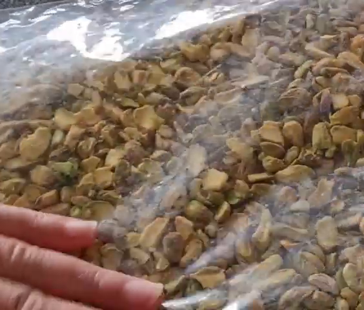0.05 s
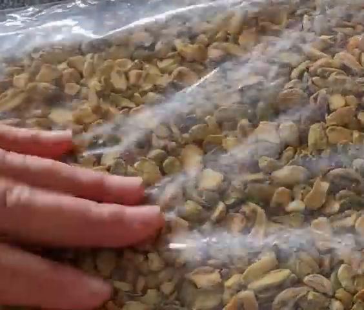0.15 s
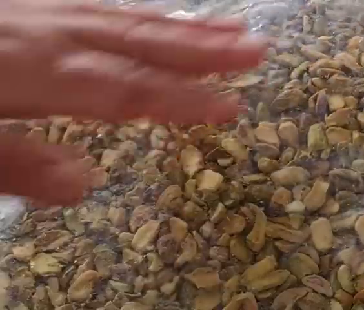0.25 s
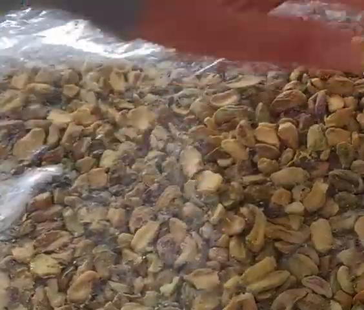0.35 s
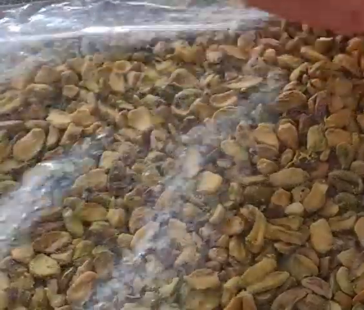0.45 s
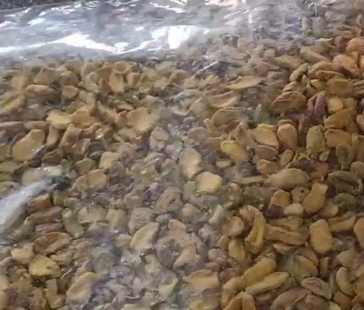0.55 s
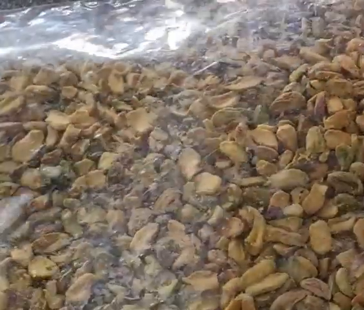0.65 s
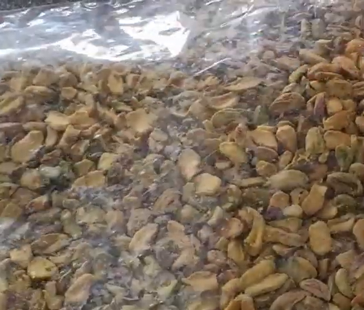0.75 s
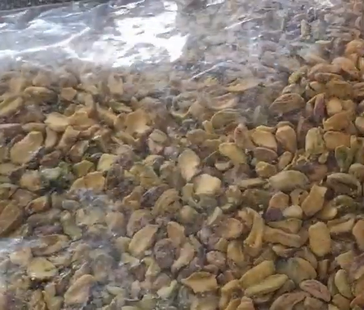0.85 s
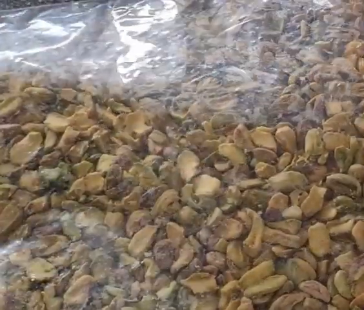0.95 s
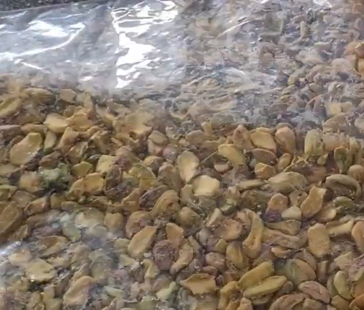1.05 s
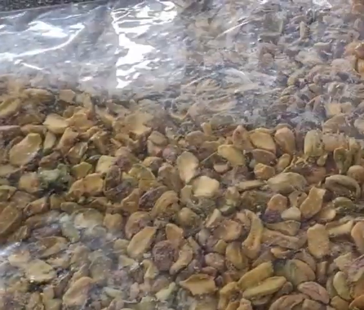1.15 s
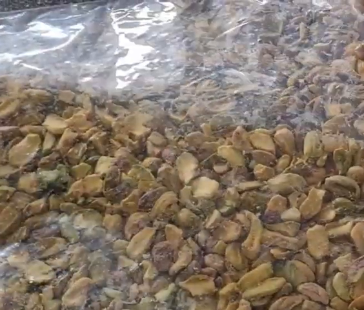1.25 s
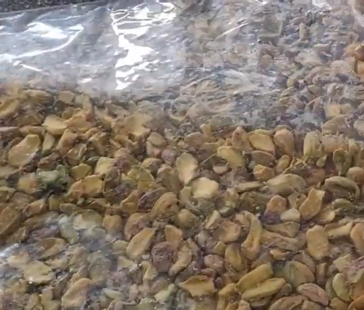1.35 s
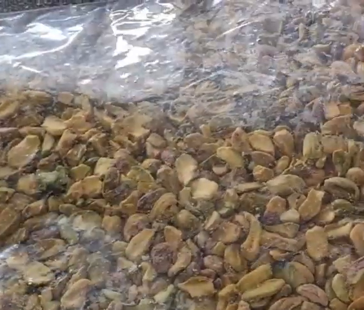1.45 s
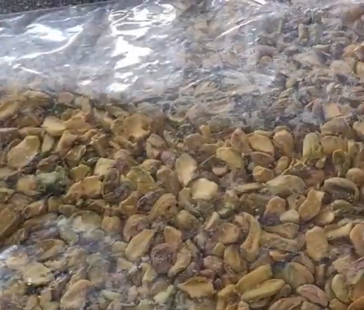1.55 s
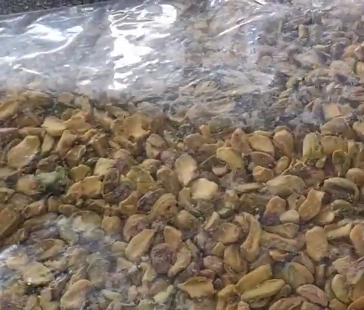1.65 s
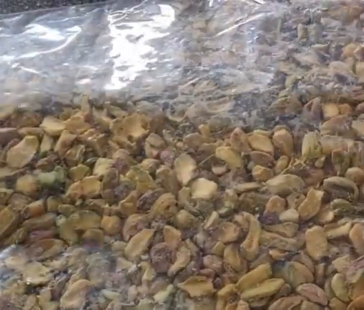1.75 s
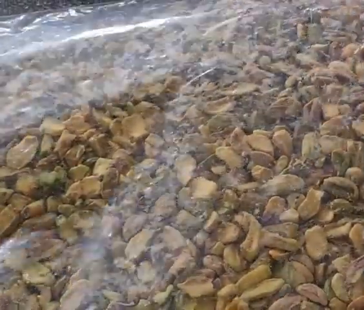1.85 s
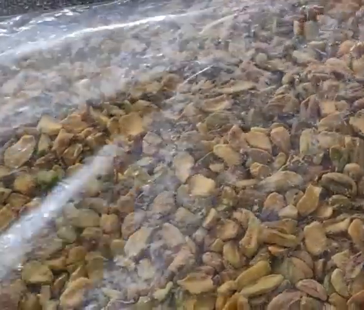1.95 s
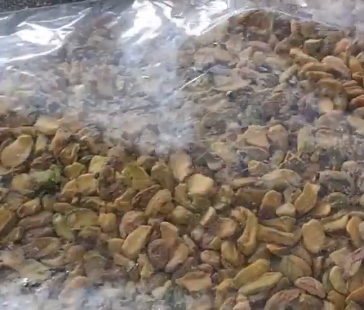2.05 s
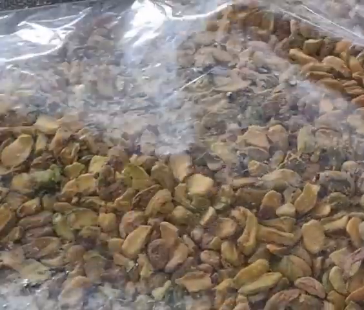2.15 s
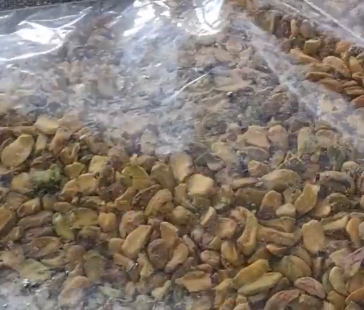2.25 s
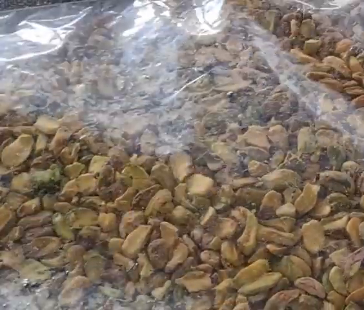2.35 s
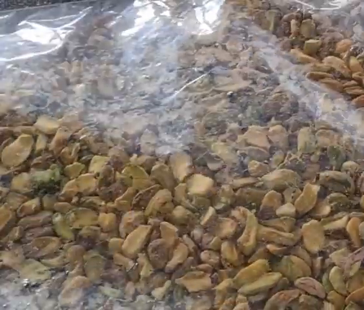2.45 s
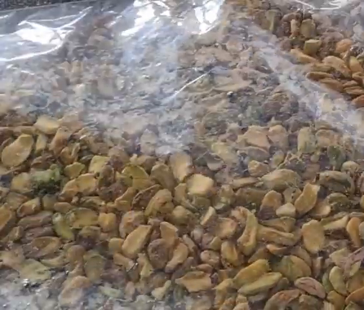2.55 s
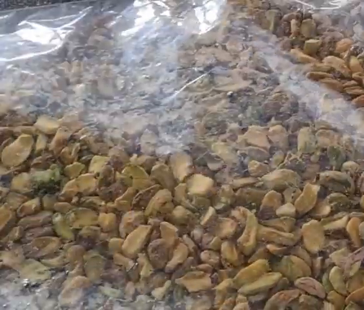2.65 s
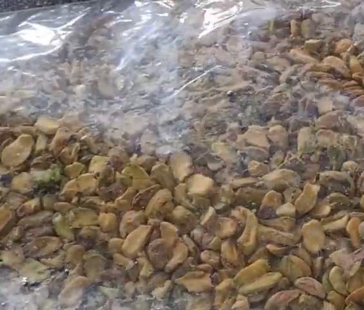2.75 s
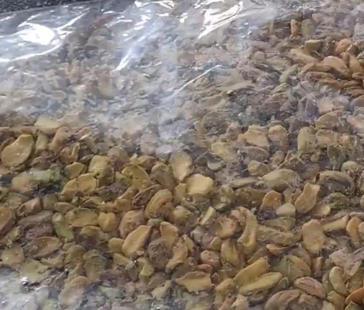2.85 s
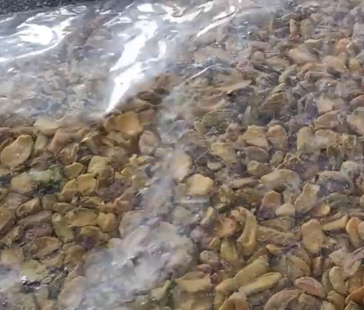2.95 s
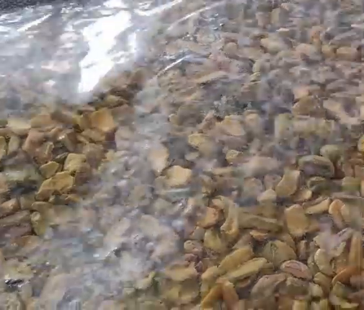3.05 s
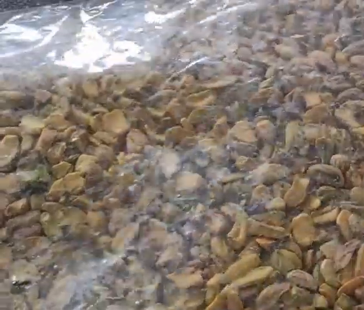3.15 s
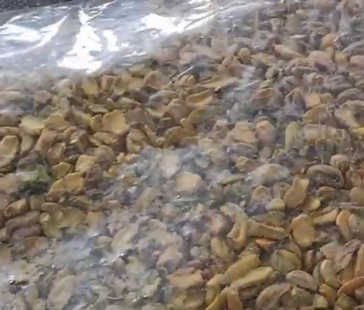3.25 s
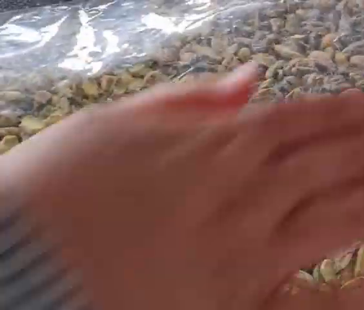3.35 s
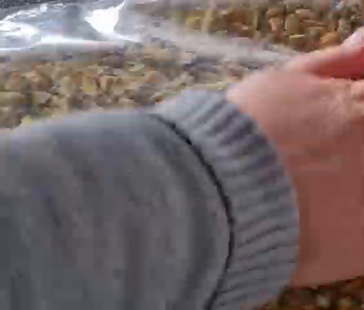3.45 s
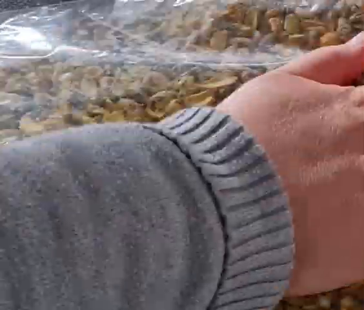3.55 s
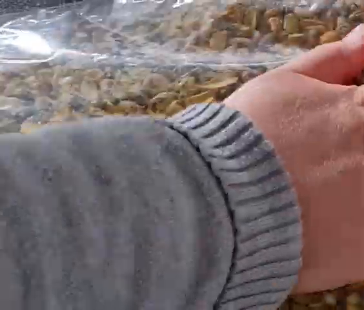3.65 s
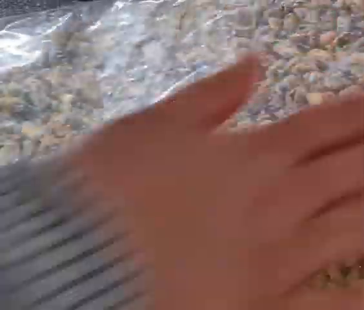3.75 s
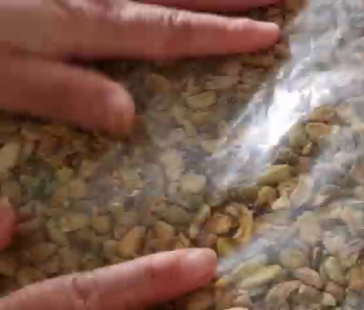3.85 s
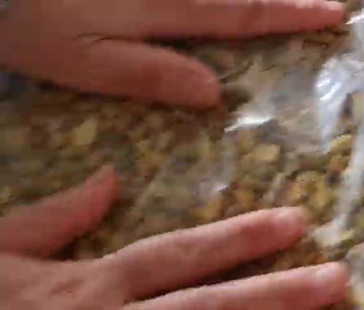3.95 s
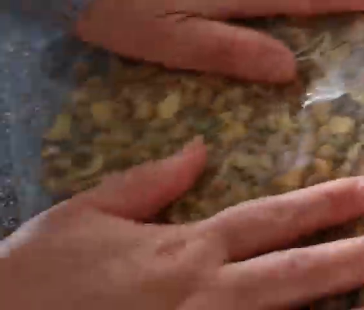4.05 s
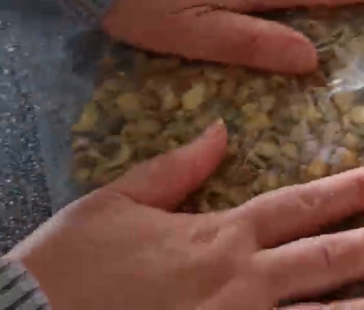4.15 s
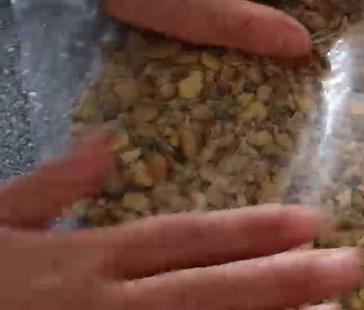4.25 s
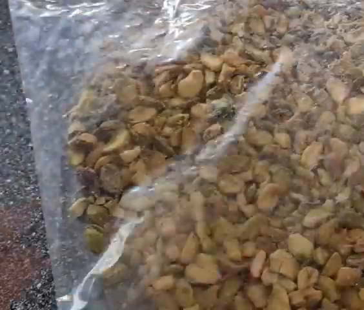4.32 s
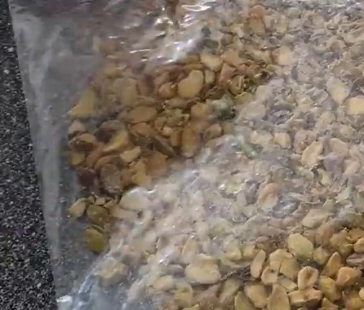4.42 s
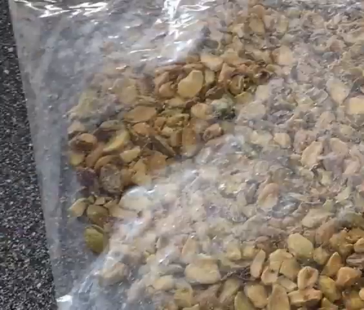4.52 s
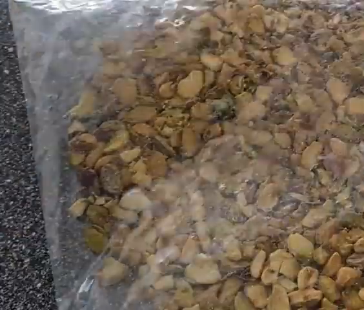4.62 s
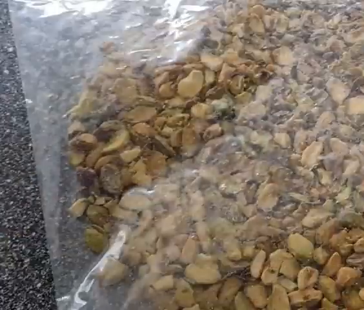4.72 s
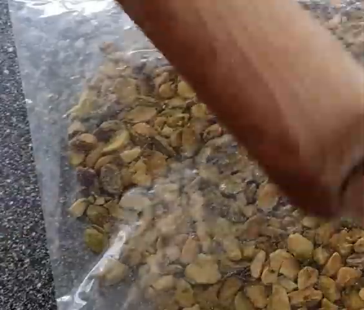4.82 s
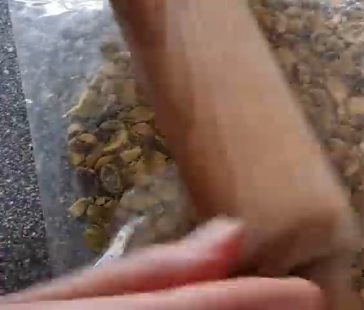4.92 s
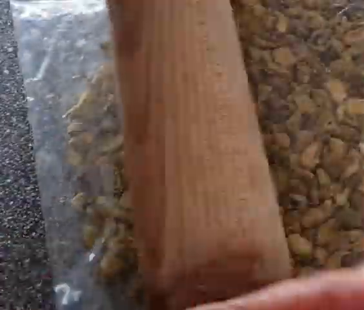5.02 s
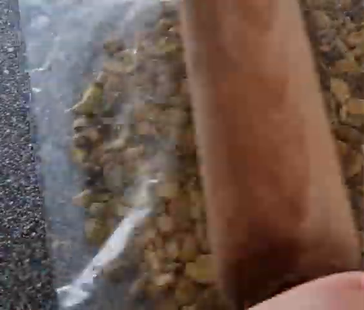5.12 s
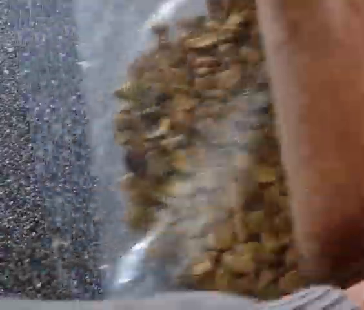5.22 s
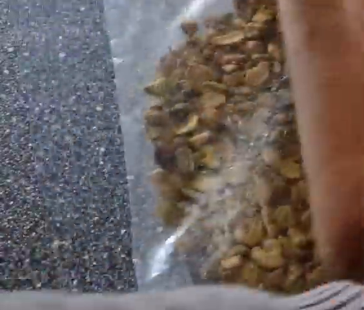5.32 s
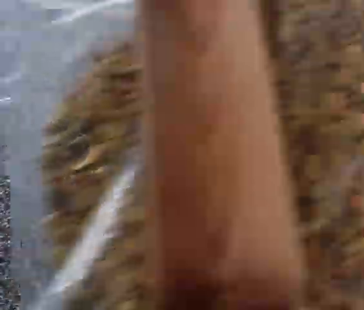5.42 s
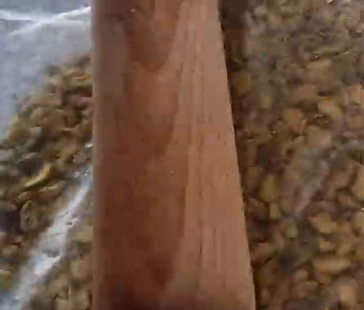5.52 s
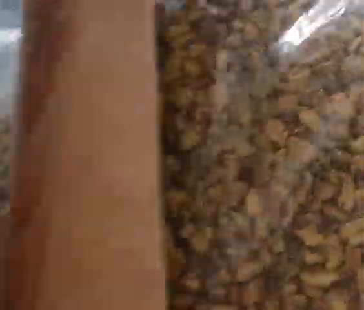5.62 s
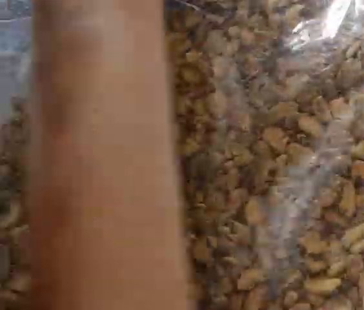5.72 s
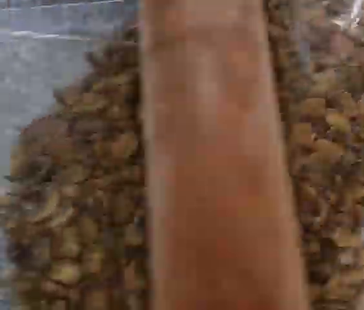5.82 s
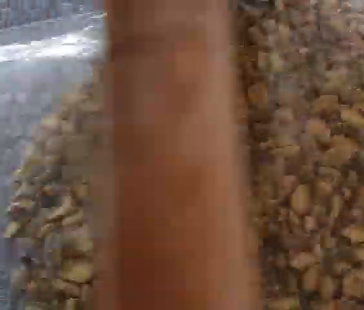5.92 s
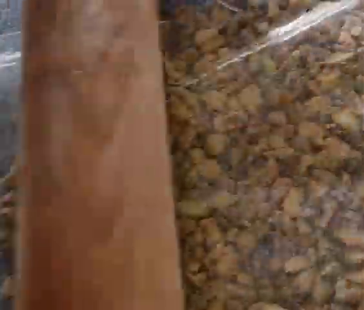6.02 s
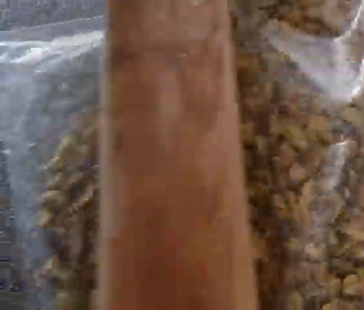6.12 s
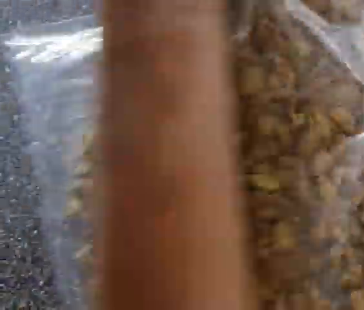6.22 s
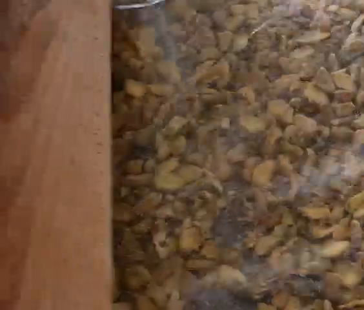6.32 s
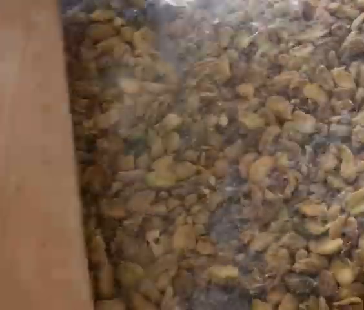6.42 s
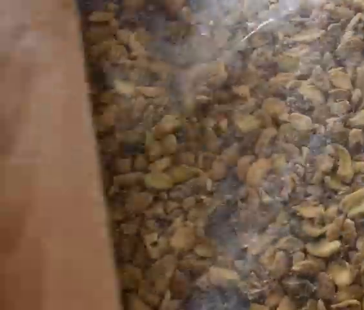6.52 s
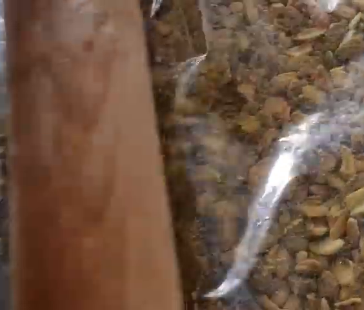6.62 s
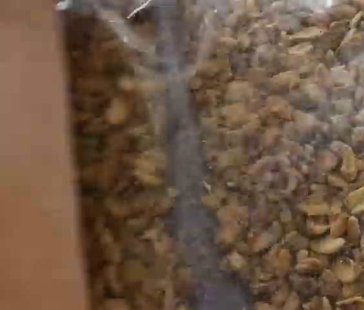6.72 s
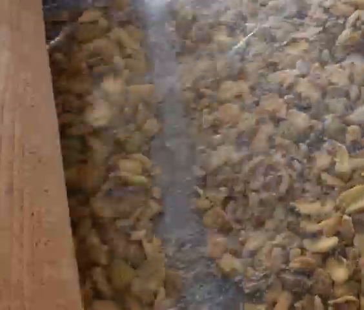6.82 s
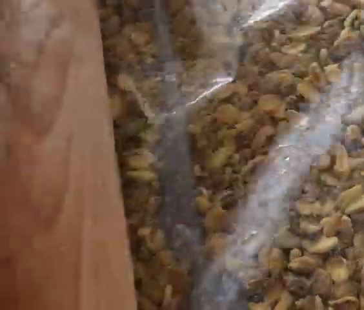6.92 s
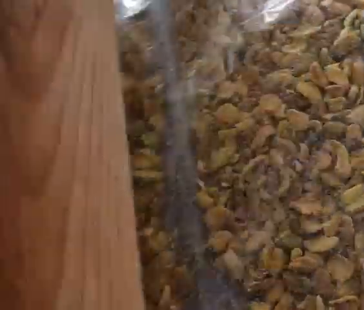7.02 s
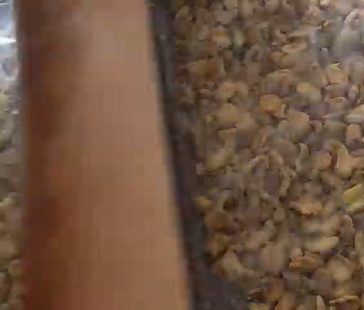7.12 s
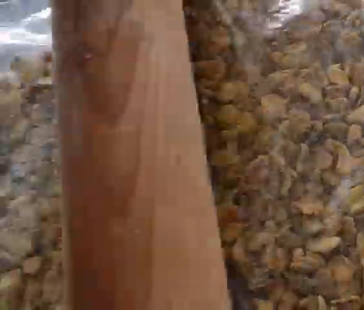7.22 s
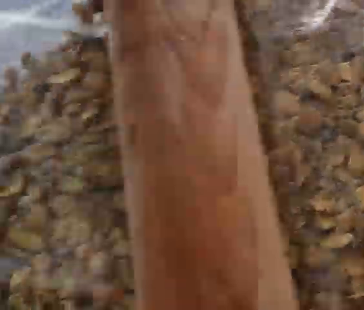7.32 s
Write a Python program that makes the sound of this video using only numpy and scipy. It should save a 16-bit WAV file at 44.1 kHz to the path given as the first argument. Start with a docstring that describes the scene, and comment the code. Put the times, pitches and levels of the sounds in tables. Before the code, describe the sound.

Light crinkling of a nut-filled plastic bag under moving hands gives way to a heavy counter thud, low rumble and dull crackling crunches.

```python
"""Plastic film rustles and snaps in short bursts as hands smooth a bag of nuts on a kitchen counter;
then a wooden rolling pin is set down with a knock and pushed over it, and the nuts crunch.
Film and nuts are bursts of coloured noise in three ranges: body, snap and fizz. The counter thuds and
the pin knocks as sums of decaying modes. Moving hands and pin add low rumble, the brushing pin a breathy
rub; a faint fuzzy squeak is a pair of tones. A little room and quiet air surround it all."""
import sys
import numpy as np
from scipy import signal
from scipy.fft import rfft, irfft, next_fast_len
from scipy.io import wavfile
from scipy.ndimage import uniform_filter1d, map_coordinates

SR = 44100
rng = np.random.default_rng(int(sys.argv[2]) if len(sys.argv) > 2 else 0)


def log_audio(samples):
    """Write samples as a 16-bit WAV file to the path given in sys.argv[1]."""
    # one column per channel
    frames = np.atleast_2d(samples).T
    # limit to full scale, then quantise
    limited = np.clip(frames, -1, 1)
    pcm = np.round(limited * 32767).astype(np.int16)
    wavfile.write(sys.argv[1], SR, pcm)


def field_ratio(decibels):
    """Amplitude ratio for a level in dB (20 dB per decade); scalars and array-likes work."""
    return 10 ** (np.asarray(decibels, dtype=float) / 20)


N = 325017

# colour of the quiet air: f/Hz, relative density/dB
AIR_COLOUR = [(25, 13), (110, -14), (220, -3), (400, -3.5), (1200, -16), (3500, -19), (6500, -12),
              (16000, -27)]
# decay of the kitchen: f/Hz, t60/s
KITCHEN_DECAY = [(200, 0.2), (10000, 0.12)]
# a faint falling squeak: t/s, f/Hz, level/dB
SQUEAK_PATH = [(2.73, 3770, -99), (2.75, 3780, -69), (2.82, 3550, -81), (2.85, 3400, -99)]
# breathy bands of the pin brushing the film: f/Hz, relative density/dB
BRUSH_COLOUR = [(1500, -11.5), (2100, 2), (2750, -18), (3500, -5), (4400, -25)]
# hands and pin moving over the counter: t/s, rumble level/dB
DRAG_PATH = [(0, -69.5), (.95, -68.5), (1.2, -79.5), (3.1, -75), (4.4, -71.5), (5.05, -65.5), (5.14, -48),
             (5.7, -53), (5.9, -52), (7.37, -57)]
# colour of that rumble: f/Hz, relative density/dB
RUMBLE_COLOUR = [(20, -2.5), (60, 0), (120, 3.5), (280, -16), (400, -60)]
# palms and pin pressing the counter: t/s, level/dB, extra level of the deep modes/dB (6 more is added)
THUD_HITS = [(0.009, -53, -7), (0.521, -38.5, -17), (2.071, -60, -19), (3.271, -56.5, 0.5),
             (3.561, -53, 4.5), (3.619, -47, -1.5), (3.859, -51.5, -3), (4.037, -48, 2.5),
             (4.416, -37.5, -8), (4.836, -40.5, -37), (5.11, -16, -13.5), (5.261, -27, -4),
             (5.369, -21.5, -22), (5.802, -47, 2.5), (5.935, -33, -3.5), (6.125, -26.5, -0.5),
             (6.401, -38, -2.5), (6.608, -21, 0), (6.902, -25, 0), (7.03, -33.5, -3.5), (7.17, -48.5, 3.5),
             (7.299, -30.5, 1)]
# modes of the counter: f/Hz, relative level/dB, t60/s
COUNTER_MODES = [(61.2, -3.5, 0.52), (89.2, -5, 0.49), (121, 0, 0.28), (162.5, -8, 0.13),
                 (230.2, -7.5, 0.28), (311.6, -9, 0.13), (394.3, -14.5, 0.18)]
# the pin bumping the counter: t/s, level/dB, hardness as extra level of the upper modes/dB
PIN_KNOCKS = [(4.726, -38.5, -14.5), (5.195, -38, -18), (5.268, -27.5, -34), (5.284, -26.5, -39)]
# modes of the wooden pin: f/Hz, relative level/dB, t60/s
PIN_MODES = [(618, -1.5, 0.073), (714, 2.5, 0.13), (795, -2, 0.035), (1353, -16.5, 0.74), (2302, 7, 0.22),
             (3290, -6, 0.19), (4700, -20, 0.32)]
# film and nuts sliding under hand or pin: start t/s, length/s, start level/dB, end level/dB
BAG_SLIDES = [(0, 0.071, -46.5, -67), (0.08, 0.39, -69.5, -68), (0.615, .18, -58, -66),
              (0.955, 0.17, -70, -60), (1.184, 0.25, -70.5, -68.5), (1.575, 0.53, -62, -68.5),
              (2.167, 0.12, -58.5, -65.5), (2.414, 0.09, -60.5, -72), (2.834, 0.061, -76.5, -60.5),
              (3.077, 0.14, -76.5, -63.5), (3.288, 0.324, -73.5, -64.5), (3.72, 0.18, -52, -78.5),
              (4.076, 0.35, -47, -65.5), (4.582, 0.12, -73.5, -59), (4.994, 0.081, -68.5, -62.5),
              (5.155, 0.32, -49, -48), (5.513, 0.3, -45.5, -56.5), (5.896, 0.46, -52, -49),
              (6.622, 0.28, -62, -57), (7.066, 0.15, -62, -62)]
# snaps of film and crunches of nuts: peak t/s, snap level/dB, fizz level relative to snap/dB, length/s
BAG_CRACKS = [(.095, -46.5, -6.5, 0.015), (0.199, -38.5, -8, 0.007), (0.304, -39.5, -12.5, .0062),
              (.611, -37.5, -6, 0.0045), (0.858, -54, -0.5, 0.019), (1.047, -51, -3.5, 0.018),
              (1.092, -39, -4.5, 0.0072), (1.427, -43, -5.5, 0.0032), (1.586, -44, -4.5, 0.006),
              (1.668, -43.5, 0, 0.0038), (1.722, -49.5, -3, 0.011), (1.872, -49.5, -14, 0.01),
              (2.029, -49, -0.5, 0.022), (2.202, -46, 0.5, 0.013), (2.259, -48.5, -25, 0.007),
              (2.451, -56, -29, 0.0088), (2.527, -53.5, -4, 0.01), (2.597, -52.5, -1, 0.0032),
              (2.939, -40, -15, 0.0031), (3.141, -53, -10, 0.015), (3.216, -54.5, 1.5, 0.012),
              (3.347, -44, -16, 0.0017), (3.627, -37.5, -9, 0.011), (3.86, -39.5, -12, 0.0086),
              (4.032, -34.5, -8, 0.012), (4.364, -50.5, -13, .014), (4.427, -50.5, -7, 0.015),
              (4.538, -50.5, -1, 0.015), (4.734, -53, -45, 0.01), (5.117, -32.5, -32, 0.0063),
              (5.277, -41.5, -8, 0.03), (5.376, -33.5, -7.5, 0.011), (5.496, -29, -13, 0.0096),
              (5.767, -50.5, -26, 0.016), (5.85, -46, -19, 0.0044), (5.936, -37.5, -7.5, 0.02),
              (5.988, -35.5, -30, 0.0051), (6.036, -48, -2, 0.0052), (6.134, -31, -30, 0.0054),
              (6.247, -26, -18, 0.0068), (6.425, -32, -6.5, 0.021), (6.513, -40.5, -15, 0.0084),
              (6.609, -34, -27, 0.0071), (6.663, -31, -45, 0.011), (6.691, -24, -1, 0.011),
              (6.761, -33, -13, 0.0095), (6.906, -31, -26, .0097), (7.029, -32.5, -40, .014),
              (7.05, -29.5, -6.5, 0.0086), (7.172, -50.5, -19, 0.0095), (7.305, -38.5, -10.5, 0.016)]
# thin ticks of creasing film: t/s, level/dB
FILM_TICKS = [(0.9602, -38.5), (1.134, -43), (1.446, -40.5), (1.7554, -31), (1.9762, -34.5), (2.0906, -33),
              (2.4546, -46.5), (2.9265, -25), (3.5674, -41), (5.46, -26.5), (5.912, -32.5), (6.3045, -29),
              (6.339, -30), (7.1372, -27)]
# share of body, snap and fizz in a tick: relative level/dB
TICK_SHARES = [-28, -24.5, -7]
# colour of the crunch's body: f/Hz, relative density/dB
BODY_COLOUR = [(150, -53), (260, -3.5), (450, -6), (1300, -10), (1900, -75)]
# colour of snapping film: f/Hz, relative density/dB
SNAP_COLOUR = [(800, -53.5), (1500, -4), (2800, -2), (5600, -7), (6300, -39)]
# duller colour of nuts breaking under the pin: f/Hz, relative density/dB
CRUSH_COLOUR = [(700, -24), (1300, 3.5), (3000, -3.5), (6000, -24.5)]
# colour of the fizzing treble: f/Hz, relative density/dB
FIZZ_COLOUR = [(5000, -13), (5900, -2.5), (11000, -7), (15500, -11.5), (16200, -40)]


def unit(x):
    """Scales a sound to rms 1."""
    return x / np.sqrt(np.mean(x ** 2) + 1e-20)


def along(points, hz):
    """Reads a curve of (f/Hz, value) points on a log frequency axis."""
    f, value = np.transpose(points)
    return np.interp(np.log(hz + 1), np.log(f + 1), value)


def curves(rows):
    """Draws one value per sample for each column after the time."""
    s, *columns = np.transpose(rows)
    return [np.interp(np.arange(N) / SR, s, column) for column in columns]


def wobble(rate):
    """A smooth random curve with rate knots a second."""
    knots = np.arange(N) * rate / SR
    return map_coordinates(rng.standard_normal(N // 20), [knots])


def noise(colour, alike, grain_db, rate, patchy_db):
    """Stereo coloured noise, rms 1: its size varies from grain to grain, brief resonances come and go."""
    _, _, z = signal.stft(rng.standard_normal((2, N)), SR, nperseg=512)
    patches = uniform_filter1d(rng.standard_normal(z.shape[1:]), size=4, axis=0)
    patches = unit(uniform_filter1d(patches, size=5, axis=1))
    patchy = signal.istft(z * field_ratio(patchy_db * patches), nperseg=512)[1][:, :N]
    a, b = patchy * field_ratio(grain_db * wobble(rate))
    # alike is the left-right likeness: 0 unrelated, 1 the same
    turn = np.arccos(np.clip(alike, 0, 1)) / 2
    middle, side = np.cos(turn) * a, np.sin(turn) * b
    pair = np.array([middle + side, middle - side])
    m = next_fast_len(N + 8192)
    gain = field_ratio(along(colour, np.fft.rfftfreq(m, 1 / SR)))
    return unit(irfft(rfft(pair, m) * gain, m)[:, :N])


def add(track, s, sound):
    """Mixes a sound into a track at time s."""
    part = track[..., max(round(s * SR), 0):][..., :sound.shape[-1]]
    part += sound[..., :part.shape[-1]]


def ring(modes, t, scatter_db):
    """Sums decaying modes at new strengths; each reaches the two microphones with its own phase."""
    hz, db, t60 = np.transpose(modes)[:, None, :, None]
    draw = rng.uniform(-0.68, 1, (3, len(modes), 1))
    phase = 2 * draw[0] + 0.8 * draw[1] * np.array([1, -1])[:, None, None]
    decay = field_ratio(db + scatter_db * draw[2] - 60 * t / t60)
    return np.sum(decay * np.sin(2 * np.pi * hz * t + phase), axis=1)


def quiet_air():
    """The air of the room as a steady bed of very quiet coloured noise."""
    return field_ratio(-80.5) * noise(AIR_COLOUR, 0, grain_db=1, rate=20, patchy_db=1)


def kitchen(x):
    """The room's answer as a noise tail in which each frequency dies at its own speed."""
    hz, t, z = signal.stft(rng.standard_normal((2, SR // 2)), SR, nperseg=256)
    decay = field_ratio(-60 * t / along(KITCHEN_DECAY, hz)[:, None])
    tail = signal.istft(z * decay, SR, nperseg=256)[1]
    return signal.fftconvolve(x, tail / np.linalg.norm(tail[0]), axes=1)[:, :N]


def squeak():
    """A tone made fuzzy by fast pitch wobble, with a weaker partner above it."""
    hz, db = curves(SQUEAK_PATH)
    fuzz_hz = 90 * np.array([wobble(210), wobble(230)])
    turn = 2 * np.pi * np.cumsum(hz * [[1], [1.15]] + fuzz_hz, axis=1) / SR
    # the two channels hear each tone at different phases
    tone = np.sin(turn[0] + [[0], [1.5]])
    partner = 0.8 * np.sin(turn[1] + [[1.5], [0]])
    return field_ratio(db) * (tone + partner)


def brush():
    """The pin brushing the film: a soft banded rub that swells and fades."""
    start_s, end_s, level_db = 4.8, 5.6, -66.5
    u = np.clip((np.arange(N) / SR - start_s) / (end_s - start_s), 0, 1)
    rub = noise(BRUSH_COLOUR, 0, grain_db=-1.5, rate=34, patchy_db=-1)
    return field_ratio(level_db) * np.sin(np.pi * u) ** 0.5 * rub


def drag():
    """Hands and pin moving over the counter make it rumble in lumps of low noise."""
    lumps_db = 3 * wobble(15)
    rumble = noise(RUMBLE_COLOUR, 0.5, grain_db=5, rate=20, patchy_db=1)
    return field_ratio(curves(DRAG_PATH)[0] + lumps_db) * rumble


def thuds():
    """A soft push rings the counter for a few cycles until hand or pin damps it."""
    out, t = np.zeros((2, N)), np.arange(SR // 4) / SR
    push = 1 - np.exp(-(t / 0.0087) ** 2)
    damping = 0.14 + 0.99 / (1 + (t / 0.045) ** 4)
    for s, db, deep_db in THUD_HITS:
        modes = [(hz, level + (deep_db + 6) * (hz < 100), t60) for hz, level, t60 in COUNTER_MODES]
        add(out, s - 0.004, field_ratio(db) * push * damping * ring(modes, t, scatter_db=6.5))
    return out


def pin():
    """The wooden pin rings at its own modes; a harder contact wakes the upper ones."""
    out, t = np.zeros((2, N)), np.arange(SR // 4) / SR
    contact = 1 - np.exp(-t / 0.001)
    for s, db, hard_db in PIN_KNOCKS:
        modes = [(hz, level + hard_db * (hz > 1000), t60) for hz, level, t60 in PIN_MODES]
        add(out, s - 0.002, field_ratio(db) * contact * ring(modes, t, scatter_db=2.5))
    return out


def slides():
    """Size of the rustle: every slide starts, drifts in level and stops."""
    start_db_per_s, stop_db_per_s = 506, 331
    start, length, first_db, last_db = np.transpose(BAG_SLIDES)[:, :, None]
    clock = np.arange(0, N + 64, 64) / SR
    t = clock - start
    db = first_db + (last_db - first_db) * np.clip(t / length, 0, 1)
    db = db + start_db_per_s * np.minimum(t, 0) - stop_db_per_s * np.maximum(t - length, 0)
    return np.interp(np.arange(N) / SR, clock, field_ratio(db).sum(0))


def burst(t, length):
    """Grain size through one crack, which peaks at t = 0: a quick swell, a slower fall."""
    u = t / max(length, 0.002)
    return np.where(u < 0, np.exp(-1.5 * u * u), np.exp(-0.8 * np.abs(u)))


def crackle():
    """Sizes of body, snap and fizz through cracks and ticks, and the bag's rustle as it slides and settles."""
    settle_db, settle_db_per_s = -19, 273.5  # starts under the crack's peak, then fades
    tick_s = 0.0019
    size, rustle = np.zeros((3, N)), slides()
    t = np.arange(-SR // 20, SR // 5) / SR
    for s, db, fizz_db, length in BAG_CRACKS:
        swell = burst(t, length)
        fizz_swell = field_ratio(fizz_db) * burst(t, 0.67 * length)  # briefest in the treble
        add(size, s + t[0], field_ratio(db) * np.array([swell, swell, fizz_swell]))
        add(rustle, s + t[0], (t > 0) * field_ratio(db + settle_db - settle_db_per_s * t))
    for s, db in FILM_TICKS:
        add(size, s + tick_s + t[0], field_ratio(db + np.c_[TICK_SHARES]) * burst(t, tick_s))
    return size, rustle


def bag():
    """Film and nuts as grainy noise in three ranges; the rumble level sets body and how far nuts dull the snap."""
    size, rustle = crackle()
    rumble_db = curves(DRAG_PATH)[0]
    weight_db = 15.5 + 0.3021 * rumble_db  # body grows with the weight on the counter
    nuts = 1 / (1 + field_ratio(-54 - rumble_db) ** 2)  # share of snap power, half at -54 dB of rumble
    stray_db = 7 * np.maximum(wobble(150) - 1, 0)  # stray ticks in the rustling treble
    even_db = np.zeros(N)
    tilt_db = np.array([even_db, even_db, stray_db - 6.5 - 4 * nuts])
    size = size + rustle * field_ratio(3.43 * wobble(35) + tilt_db)
    body = noise(BODY_COLOUR, 0, grain_db=2.5, rate=300, patchy_db=3.5)
    film = noise(SNAP_COLOUR, 0, grain_db=3, rate=500, patchy_db=3)
    crush = noise(CRUSH_COLOUR, 0, grain_db=3.5, rate=400, patchy_db=4)
    snap = np.sqrt(1 - nuts) * film + np.sqrt(nuts) * crush
    fizz = noise(FIZZ_COLOUR, 0, grain_db=2.5, rate=370, patchy_db=0.5)
    fizz = fizz * field_ratio([[1.5], [-1.5]])  # leans to the left
    return field_ratio(weight_db) * size[0] * body + size[1] * snap + size[2] * fizz


def scene():
    """Mixes the close sounds with a little room and the quiet air."""
    near = bag() + drag() + thuds() + pin() + brush() + squeak()
    return near + field_ratio(-7.5) * kitchen(near) + quiet_air()


def roll_off(x):
    """The treble ends steeply here."""
    return signal.sosfilt(signal.butter(12, 16820, fs=SR, output="sos"), x)


def record(dry):
    """Passes the finished mix on to the output."""
    return roll_off(dry)


dry = scene()
out = record(dry)
log_audio(out)
```